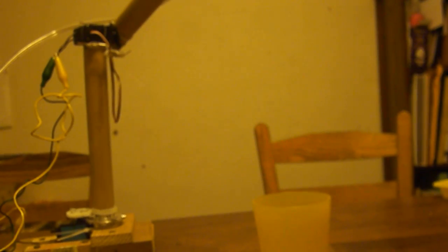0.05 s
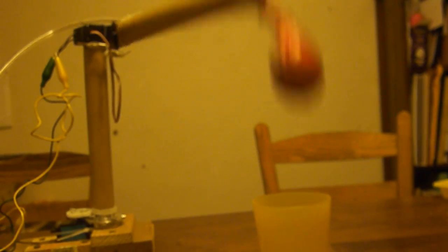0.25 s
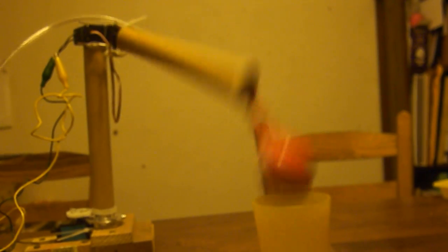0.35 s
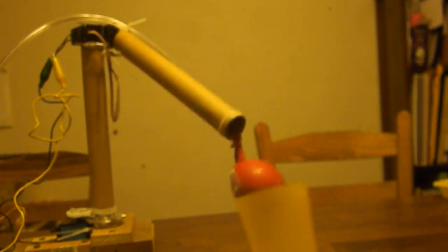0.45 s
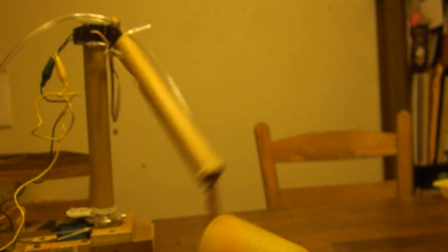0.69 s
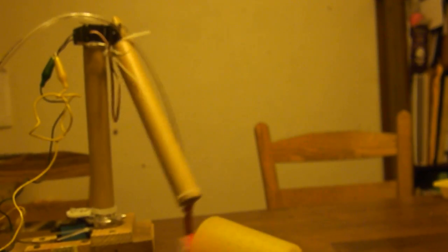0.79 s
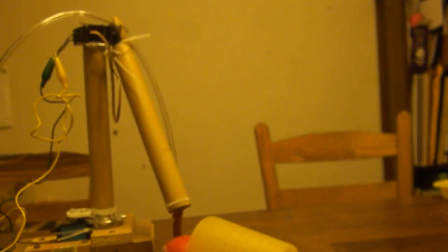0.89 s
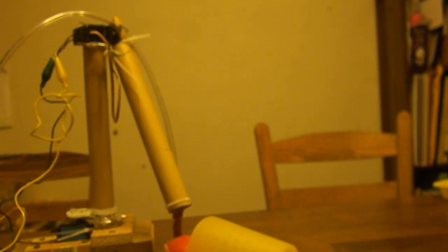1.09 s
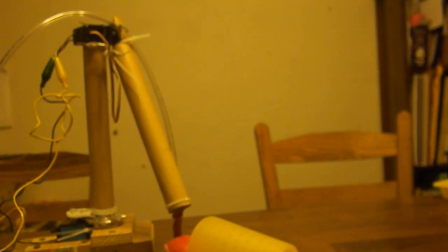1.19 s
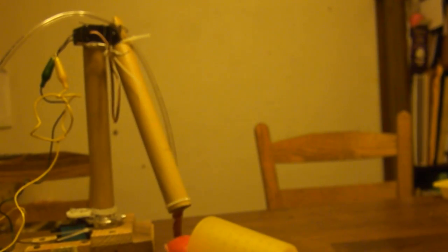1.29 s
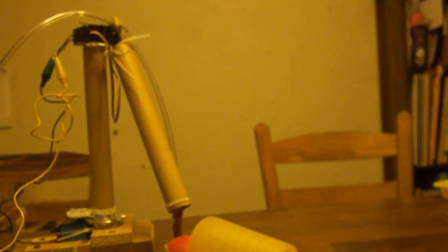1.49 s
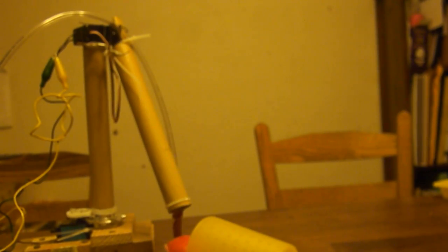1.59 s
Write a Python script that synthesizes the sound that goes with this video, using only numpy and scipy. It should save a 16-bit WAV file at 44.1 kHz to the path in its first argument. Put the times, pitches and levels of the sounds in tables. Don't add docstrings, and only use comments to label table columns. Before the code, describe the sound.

Buzzy whine of a small servo-like motor rising and cutting out, light knocks on a plastic cup, a second short whirr, then sharp clattering as the cup tips on a table; close, hissy camera microphone indoors.

```python
import sys
import numpy as np
from scipy import signal
from scipy.fft import rfft, irfft
from scipy.io import wavfile
from scipy.ndimage import uniform_filter1d

SR = 44100
rng = np.random.default_rng(int(sys.argv[2]) if len(sys.argv) > 2 else 0)


def elevation(decibels):
    levels = np.asarray(decibels, float)
    return 10 ** (levels / 20)


def dump(signal):
    limited = np.clip(np.atleast_2d(signal).T, -1, 1)
    pcm = np.round(limited * 32767).astype(np.int16)
    wavfile.write(sys.argv[1], SR, pcm)


N = 72765
T = np.arange(N) / SR

# t/s, rate of meeting gear teeth f/Hz, level/dB
MOTOR_RUN = [(.085, 382, -79.5), (.105, 468, -53.5), (.176, 777, -41.5), (.215, 938, -36), (.25, 1199, -24),
             (.3, 1409, -24), (.34, 1735, -18), (.368, 1886, -20), (.43, 1766, -25.5), (.472, 1650, -29),
             (.505, 1414, -58.5), (.6, 800, -48.5), (.66, 912.5, -35), (.695, 1114, -30),
             (.727, 1114, -24.5), (.74, 1104, -51), (.825, 1224, -31.5), (.86, 1159, -41.5)]
# multiple of the tooth rate, level/dB
GEAR_OVERTONES = [(1, -12.5), (2, -2), (3, -1.5), (4, -1), (5, -2), (6, -0.5), (7, 3)]
# f/Hz, width/Hz, level/dB
HOUSING = [(1920, 610, -12.5), (2250, 155, -20.5), (3338, 780, 0.5), (4350, 176.5, -4.5), (4738, 240, 0),
           (5590, 340, 1.5), (6230, 300, -1), (6750, 465, -2)]
# f/Hz, width/Hz, level/dB
HOUSING_TREBLE = [(8600, 750, -0.5), (9580, 490, 0.5), (11250, 2600, -2.5), (13950, 1400, -10.5)]
# t/s, knock level/dB, crack level/dB, cup pitch ratio
HITS = [(.407, -23.5, -60, .98), (0.419, -21.5, -60, 1.16), (.432, -20, -18.5, 1.4),
        (.5803, -41, -37, 0.42), (.6338, -13.5, -16.5, .95), (.6405, -19, -27, .85), (.652, -18, -30, 0.7),
        (0.6946, -43, -22.5, 0.98), (0.7294, -10, 2.5, 1.27), (0.7299, 0, -3.5, 1.27),
        (0.7511, -10.5, -5, 1.25), (0.7736, -13, -14, 1.4), (.787, -18, -24, 1.27),
        (0.7924, -15.5, -38, 1.3), (.8005, -7, -38, 1.1), (0.9514, -58, -29.5, 1.2),
        (0.9534, -65, -42, 0.96)]
# f/Hz, level/dB, time to fade by 60 dB/s
CUP_TONES = [(355, -21.5, 0.067), (569, -8, 0.046), (700, -3, .03), (778.6, 1.5, 0.034), (1208, -13, 0.052),
             (1607, -3, 0.021), (2422, -2.5, 0.015), (3055, -7.5, 0.012)]
# t/s, level/dB, hollow note of the standing cup f/Hz
SCRAPE = [(.4, -66, 770), (.415, -41, 765), (.49, -50.5, 760), (.545, -44, 749.2), (.63, -47.5, 761),
          (.637, -44.5, 746), (.668, -41, 458), (.69, -45, 613), (.722, -47, 700), (.74, -27, 700),
          (.835, -25.5, 700), (.9, -47, 700), (.99, -62, 700)]
# f/Hz, width/Hz, level/dB
TABLE = [(203.7, 71, -16), (324, 230, -11.5), (560, 590, -8), (739, 47, -5.5), (964, 170, -2.5),
         (1465, 350, -13.5), (1833, 280, -6), (2810, 600, -11), (3620, 600, -17), (6000, 3000, -9),
         (9900, 2200, -10)]
# f/Hz, level per Hz/dB
AIR_COLOUR = [(30, -36), (120, -16.5), (240, -7), (450, -2.5), (1000, -8), (2400, -14), (5000, -19),
              (15500, -20)]
# f/Hz, level/dB
HUM = [(351, -67), (2340, -76)]

TEETH, TURN_AT_S = 10, .2175
TURN_DEPTH_DB, TOOTH_SCATTER_DB, TOOTH_JITTER = 16, 4.5, .011
STOP_DB_PER_S, BRIGHT_DB_PER_OCTAVE = 185, 8
WHINE_DIRECT_DB, WHINE_TOP_HZ = -5.5, 4600
WHINE_DB, WHINE_DB_PER_OCTAVE, COAST_DB_PER_HZ_S = 3, 9, .002
CRACK_S, CRACK_HZ, CRACK_WIDTH_HZ, CRACK_WIDE_DB = .0007, 10300, 2200, -2
STANDING_DULL_DB = -18
GRAINS_PER_S, GRAIN_SCATTER_DB, LEAN_WIDTH_HZ, LEAN_RUB_DB = 5000, 2.5, 70, -1
FALLEN_AT_S, FALL_S = .722, .01
ROOM_T60_S, ROOM_DB, ROOM_DAMP_HZ = .3, -11, 5640
AIR_DB = -52
NOTCH_HZ, NOTCH_WIDTH_HZ, TOP_HZ, SKEW = 7880, 1500, 15720, .05


def curve(table, col):
    points = np.array(table)
    return np.interp(T, points[:, 0], points[:, col])


def unit(x):
    return x / np.sqrt(np.mean(x ** 2))


def band(x, hz, width):
    return signal.lfilter(*signal.iirpeak(hz, hz / width, SR), x)


def body(x, peaks):
    out = 0
    for k, (hz, width, db) in enumerate(peaks):
        gain = (-1) ** k * elevation(db) / np.sqrt(width)
        out = out + gain * band(band(x, hz, 1.5 * width), hz, 1.5 * width)
    return out


def walk(rate):
    k = int(SR / rate)
    steps = np.repeat(rng.standard_normal(N // k + 1), k)
    return unit(uniform_filter1d(uniform_filter1d(steps, k), k)[:N])


def gear_whine(hz, phase):
    wobble = np.cumsum(hz * TOOTH_JITTER * walk(200)) / SR
    teeth = 0
    for k, db in GEAR_OVERTONES:
        level = elevation(db + TOOTH_SCATTER_DB * walk(70.17))
        teeth = teeth + level * np.cos(2 * np.pi * k * (phase + wobble))
    teeth = unit(teeth)
    direct = signal.sosfilt(signal.butter(4, WHINE_TOP_HZ, fs=SR, output="sos"), teeth)
    return unit(body(teeth, HOUSING)) + elevation(WHINE_DIRECT_DB) * direct


def turn_swell(hz, phase):
    turns = (phase - phase[int(TURN_AT_S * SR)]) / TEETH
    turn = np.cos(2 * np.pi * turns) * np.clip(1.7 - hz / 1300, .15, 1)
    swell = elevation(TURN_DEPTH_DB * turn / 2 + 2.6 * walk(90))
    return swell / np.sqrt(uniform_filter1d(swell ** 2, size=1500))


def gear_rasp(hz, swell):
    noise = rng.standard_normal(N) * swell
    scale = np.std(body(rng.standard_normal(N), HOUSING))
    treble = body(noise, HOUSING_TREBLE) * elevation(BRIGHT_DB_PER_OCTAVE * np.log2(hz / 1500))
    return (body(noise, HOUSING) + treble) / scale


def motor():
    hz = curve(MOTOR_RUN, col=1)
    phase = np.cumsum(hz) / SR
    whine = gear_whine(hz, phase)
    swell = turn_swell(hz, phase)
    rasp = gear_rasp(hz, swell)
    slow_db = WHINE_DB_PER_OCTAVE * np.minimum(np.log2(hz / 1250), 0)
    speeding_up = uniform_filter1d(np.gradient(hz) * SR, size=800)
    coast_db = np.clip(COAST_DB_PER_HZ_S * speeding_up, -16, 0)
    share = elevation(WHINE_DB + slow_db + coast_db)
    stop_db = STOP_DB_PER_S * np.maximum(T - MOTOR_RUN[-1][0], 0)
    level = elevation(curve(MOTOR_RUN, col=2) - stop_db)
    return level * (rasp + share * whine * swell ** 0.32) / np.sqrt(1 + share ** 2)


def cup_ring(ratio, chance, t):
    ring = 0
    for (hz, db, t60), (a, b) in zip(CUP_TONES, chance):
        dull_db = STANDING_DULL_DB * (hz > 1000) * (ratio < 1.1)
        tone = np.sin(2 * np.pi * hz * ratio * (1 + 0.026 * b) * t)
        ring = ring + elevation(db + a + dull_db) * tone * elevation(-60 * t / t60)
    return ring * (1 - np.exp(-t / 0.0012))


def cup_crack(t):
    burst = rng.standard_normal(len(t)) * (t / CRACK_S) * np.exp(1 - t / CRACK_S * 1.3)
    crack = band(burst, CRACK_HZ, CRACK_WIDTH_HZ) * 2 + elevation(CRACK_WIDE_DB) * band(burst, 3800, 11000)
    return crack / np.sqrt(np.sum(crack ** 2) / (2 * CRACK_S * SR))


def hits():
    out, t = np.zeros(N + SR), np.arange(SR // 4) / SR
    chances = rng.standard_normal((len(HITS), len(CUP_TONES), 2))
    for (s, knock_db, crack_db, ratio), chance in zip(HITS, chances):
        knock = elevation(knock_db) * cup_ring(ratio, chance, t) * 0.55
        crack = elevation(crack_db) * cup_crack(t) * .5
        i = int(s * SR)
        out[i:i + len(t)] += knock + crack
    return out[:N]


def scrape():
    grains = (rng.random(N) < GRAINS_PER_S / SR) * rng.standard_normal(N)
    grains = grains * elevation(GRAIN_SCATTER_DB * walk(110))
    rub = unit(body(grains, TABLE))
    loudness = elevation(3.5 * walk(LEAN_WIDTH_HZ))
    pitch = curve(SCRAPE, col=2) * (1 + .025 * walk(150))
    hollow = loudness * np.cos(2 * np.pi * np.cumsum(pitch) / SR) * np.sqrt(2)
    fallen = np.clip((T - FALLEN_AT_S) / FALL_S, 0, 1)
    standing_sound = hollow + elevation(LEAN_RUB_DB) * rub
    return elevation(curve(SCRAPE, col=1)) * (fallen * rub + (1 - fallen) * standing_sound)


def room(x):
    t = np.arange(SR // 2) / SR
    tail = rng.standard_normal(len(t)) * elevation(-60 * t / ROOM_T60_S) * (t > .004)
    tail = signal.sosfilt(signal.butter(1, ROOM_DAMP_HZ, fs=SR, output="sos"), tail)
    tail = tail / np.sqrt(np.sum(tail ** 2))
    return elevation(ROOM_DB) * signal.fftconvolve(x, tail)[:N]


def air():
    hz = np.maximum(np.fft.rfftfreq(N, 1 / SR), 1)
    points = np.array(AIR_COLOUR)
    colour = elevation(np.interp(np.log(hz), np.log(points[:, 0]), points[:, 1]))
    hum = sum(elevation(db) * unit(band(rng.standard_normal(N), f, 4)) for f, db in HUM)
    drift_db = .5 * walk(8)
    hiss = unit(irfft(rfft(rng.standard_normal(N)) * colour, N))
    return elevation(AIR_DB + drift_db) * hiss + hum


def scene():
    near = motor() + hits() + scrape()
    near = signal.sosfilt(signal.butter(2, 170, "high", fs=SR, output="sos"), near)
    return (near + room(near) + air())[None]


def top_cut(x):
    return signal.sosfilt(signal.butter(12, 17160, fs=SR, output="sos"), x)


def record(dry):
    x = np.tanh(1.1 * dry) / 1.1
    lopsided = np.tanh(8 * x) ** 2 / 64
    x = x + SKEW * signal.lfilter(*signal.butter(1, 15, "high", fs=SR), lopsided)
    notch = signal.iirnotch(NOTCH_HZ, NOTCH_HZ / NOTCH_WIDTH_HZ, SR)
    x = signal.lfilter(*notch, signal.lfilter(*notch, x))
    x = signal.sosfilt(signal.ellip(14, .2, 80, TOP_HZ, fs=SR, output="sos"), x)
    return top_cut(x)


dry = scene()
out = record(dry)
dump(out)
```